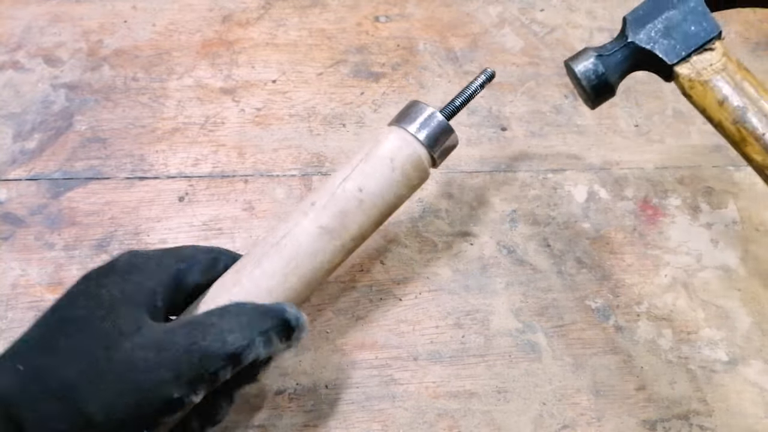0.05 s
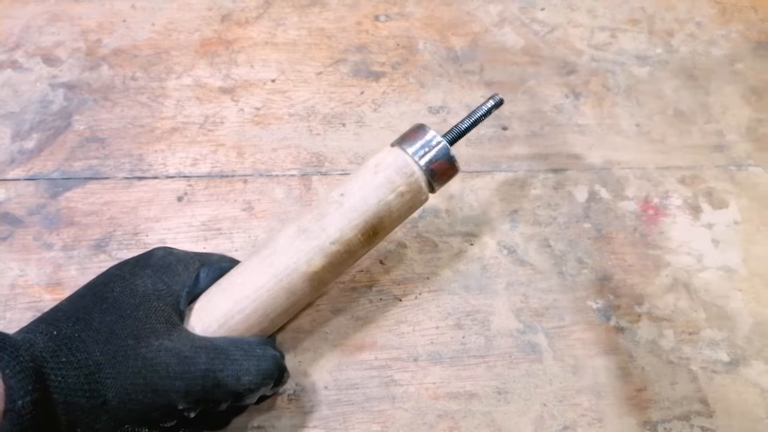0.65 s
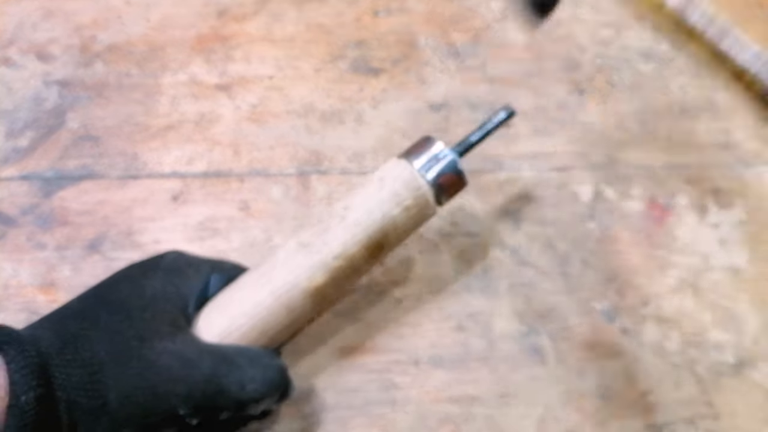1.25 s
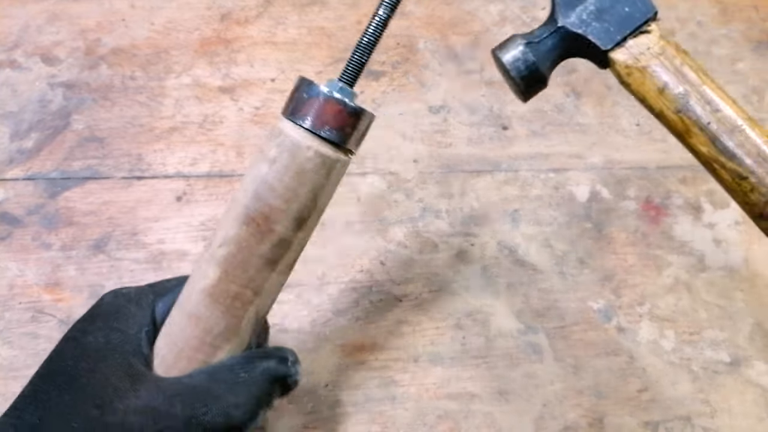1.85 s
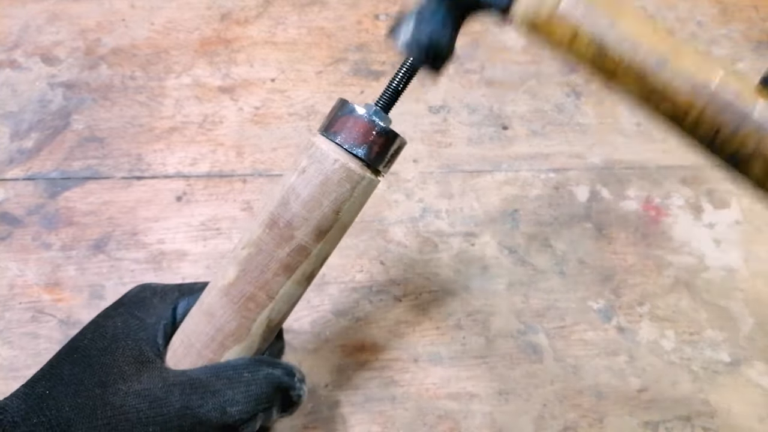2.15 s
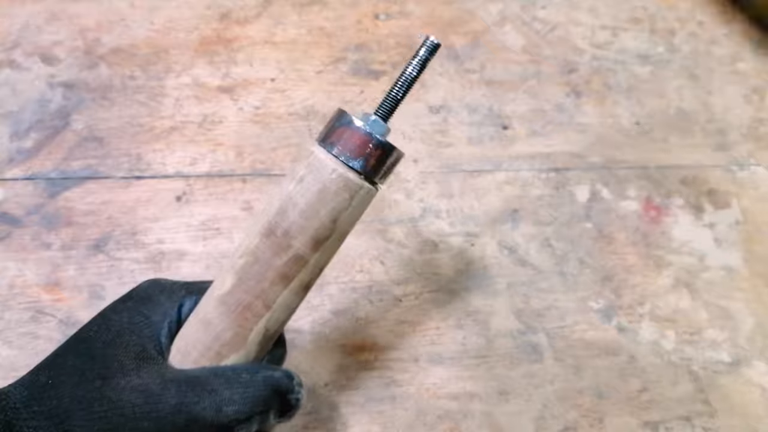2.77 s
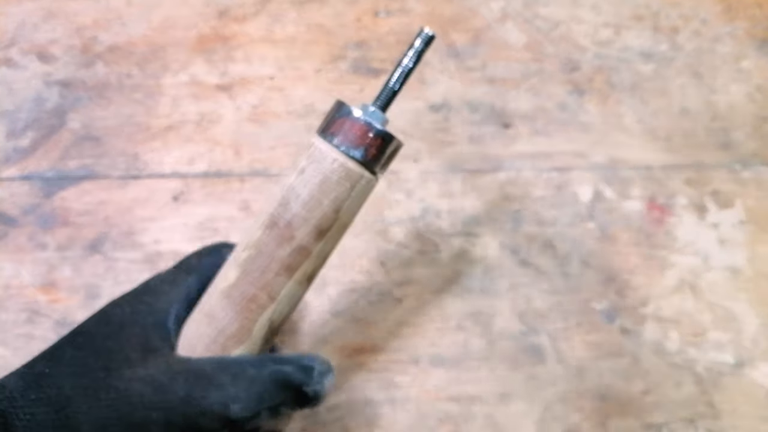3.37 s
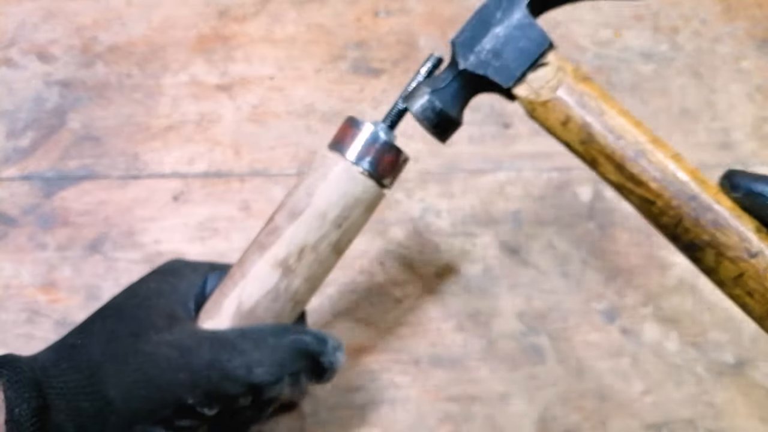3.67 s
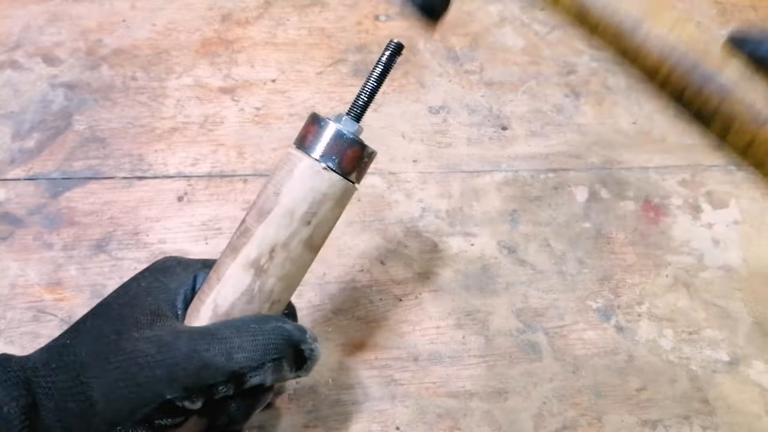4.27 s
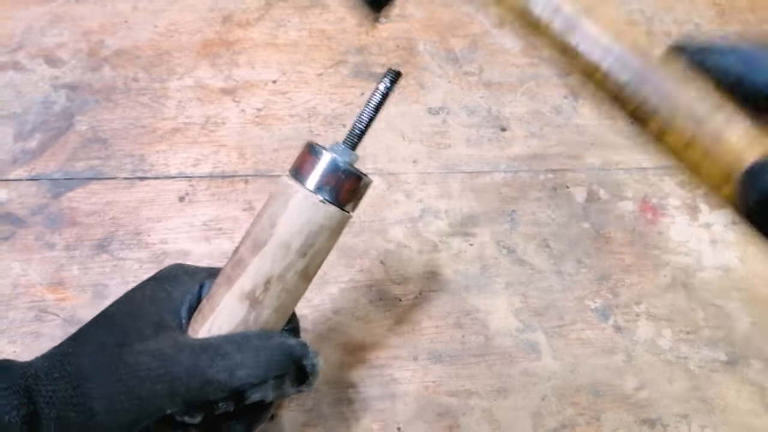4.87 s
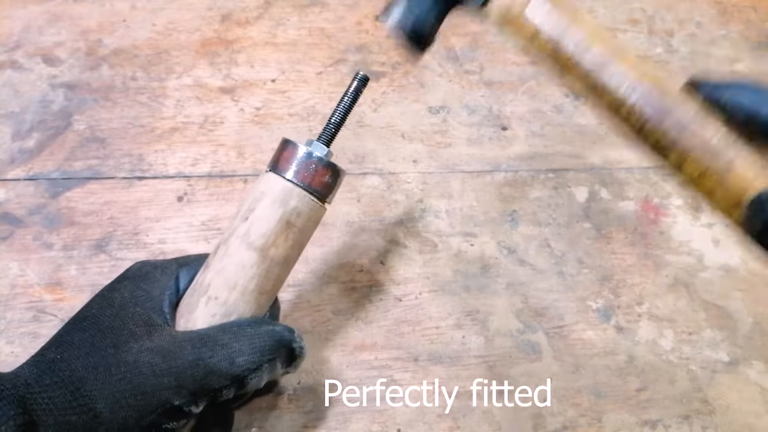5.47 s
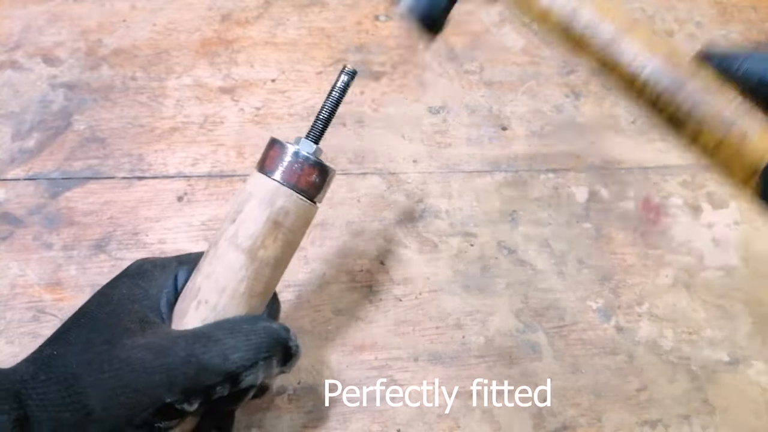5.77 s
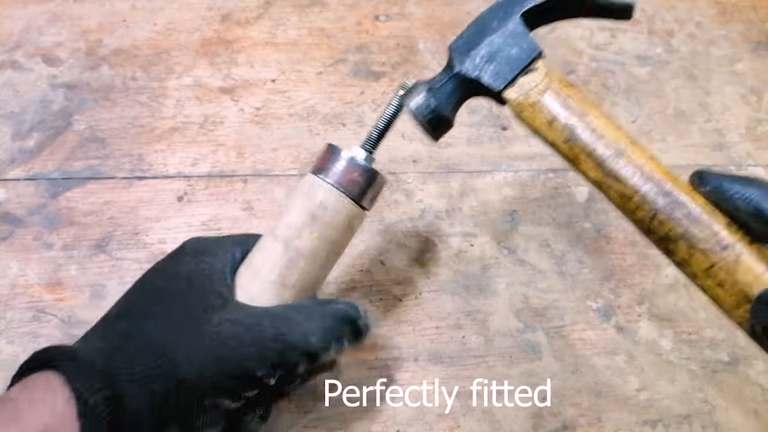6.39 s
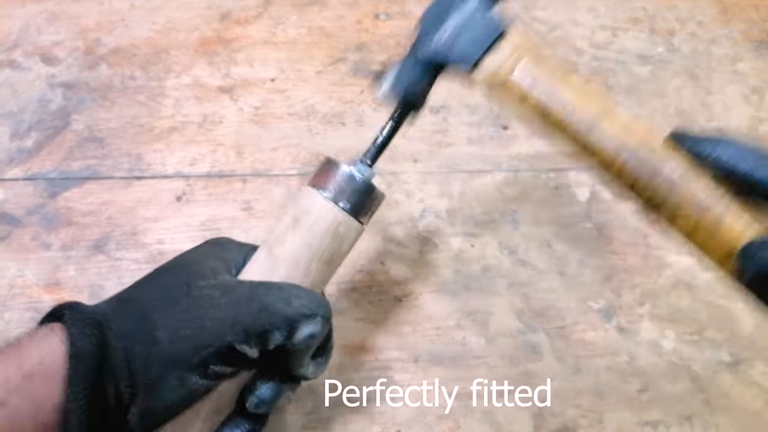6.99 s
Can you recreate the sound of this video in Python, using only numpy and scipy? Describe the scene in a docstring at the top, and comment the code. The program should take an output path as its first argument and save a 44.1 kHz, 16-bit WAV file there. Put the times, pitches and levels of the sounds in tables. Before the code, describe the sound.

Close, crisp hammer taps land on steel fitted in a wooden handle, about six a second, in three longer runs and then two shorter ones. The strikes crack and ring briefly in a small workshop, with the handle knocking back and the hammer head sometimes chattering. Faint glove rustles and light clicks fill the pauses, over quiet room tone and a very high, insect-like pulsing hiss.

```python
"""A gloved hand shifts on a wooden tool handle, and a hammer is laid against its steel tang and ferrule.
Five quick runs of blows follow, most led in by light touches. Each impact cracks, excites the damped
modes of steel and wood and reverberates in a small workshop; the handle then drops back with a dull
knock, and the head sometimes chatters. After the first run the tang's note lies a little lower.
Throughout, over faint room tone, a thin high hiss, perhaps an insect, pulses twenty times a second."""
import sys
import numpy as np
from scipy import signal
from scipy.fft import rfft, irfft
from scipy.io import wavfile

SR = 44100
rng = np.random.default_rng(int(sys.argv[2]) if len(sys.argv) > 2 else 0)


def wrap_up_sound(samples):
    """Save the sound to the file named by the first command line argument, as 16-bit audio."""
    columns = np.atleast_2d(samples).T
    # keep every value between -1 and 1, then stretch to whole-number steps
    tamed = np.clip(columns, -1, 1)
    steps = np.round(tamed * 32767).astype(np.int16)
    wavfile.write(sys.argv[1], SR, steps)


N = 310464
AGE = np.arange(SR // 3) / SR  # seconds since a contact
LEAD_S = .00008  # direct sound reaches the left microphone port first

# Full blows. Each row: start in seconds, then four traits in dB against an average blow: force,
# clank (the head sounds), edge (more tang, less wood) and jerk (the handle jumps).
BLOWS = [(0.4958, -2, -2, -1, 7), (0.6426, -3.5, -4, -1.5, -1), (0.7918, -4.5, 0, 0, 3),
         (0.9435, -1, 1.5, 4, 9.5), (1.0958, 4, -2, 2, 2.5), (1.263, 3.5, -2, 2, 5),
         (1.4167, 2.5, -1.5, 1.5, 3.5), (2.3308, -3, 3.5, -1.5, -0.5), (2.4804, -2, 3, 0.5, 4),
         (2.633, 0, 4, -1, 5), (2.7891, -6, 5.5, -1.5, 0.5), (2.9448, 5, 0, 2, 5),
         (3.116, 1.5, 1, -1.5, -14.5), (3.2747, 0, 2, 2, 0), (3.9741, -2.5, -5, -5, -10),
         (4.1284, -0.5, 0, -1, 5), (4.283, 1.5, -1.5, 0, -4), (4.4375, 2, 0, -2.5, -2),
         (4.592, 4, 0.5, -1.5, -2), (4.7431, 1, -2, -.5, 1.5), (4.8982, -5.5, 3.5, -1, 0),
         (5.4831, -5.5, -4, 3.5, -1.5), (5.6413, 0, -2, -4, -23), (5.7919, 0.7, -.8, 5, 9.5),
         (5.9444, 4, -1.5, -1.5, 14), (6.0902, 0, -3.5, 2.5, -3), (6.7233, -1.6, 0.5, -2, -5),
         (6.8803, 1.5, 3, -1, 3.5), (7.0336, 1.5, -1.5, -1, 1)]
# Light touches. Each row: start in seconds, relative force in dB, brightness in dB.
TOUCHES = [(0.3241, 7.5, 9), (1.3137, -8, -9), (2.068, -23, -1), (2.0995, -15, -6.5), (2.1485, 0.5, 2),
           (2.1548, 4, 0.5), (2.1668, 5, 11), (2.2045, -12, 4), (3.7513, -2, -1), (3.7745, -8, -4.5),
           (3.7845, 0, -0.5), (3.792, 9, 9), (4.0215, -1.5, -6.5), (4.333, -3.5, 4), (4.3395, 0.5, -3),
           (4.497, -4, -4.5), (6.0032, 1, 9.5), (6.4886, 3.5, -1), (6.494, -2.5, -7.5), (6.5015, 8, -4.5),
           (6.5085, -6, 10), (6.5148, 7, 9)]
# Modes. Each row: frequency in Hz, relative level in dB, time to decay by 60 dB in seconds.
STEEL_MODES = [(1722, -13, 0.042), (1896, -3.5, 0.026), (2214, -3.5, 0.017), (3098, -1, 0.021),
               (3754, -7.5, 0.02), (4063, -1.5, 0.021), (4130, -25, 0.14), (6258, -2.5, 0.023),
               (6570, -27.5, 0.21), (7780, -3, 0.0045), (9200, -5, 0.028), (10900, -2, .014),
               (13400, -6.5, .008)]  # hammer head and ferrule
WOOD_MODES = [(426, -10.5, 0.041), (472.7, -14.5, 0.072), (552, -9.5, 0.051), (622.7, -1, 0.039),
              (679.8, -11, 0.17), (718.6, -4, 0.044), (827.6, -4.5, .035), (887, -11.5, 0.067),
              (1044, -13, 0.065), (1129, -14, 0.053)]  # handle and bench
ROOM_MODES = [(124, -15, 0.18), (197.5, -1, 0.35), (225, 4.5, 0.36), (265, -10.5, .2)]  # low standing waves

# The five registers of a contact: wood, clank, clack, ring, tick. Each row: lower and upper edge in Hz.
REGISTER_EDGES = [(400, 1100), (1400, 2600), (2600, 4600), (4800, 7500), (9000, 15500)]
# Each entry: centre of a register in Hz.
REGISTER_HZ = [700, 2000, 3500, 6000, 12000]
# Average contacts before panning and reverberation. Each entry: level of a register in dB.
BLOW_DB = (-42.5, -43, -38.5, -36, -35)
REBOUND_DB = (-57.5, -63, -67.5, -70, -77.5)
TOUCH_DB = (-50.5, -53, -49, -54, -60.5)
# Each entry: dB gained by a register for one dB of a trait.
FORCE_SHARE = (0.94, 0.72, 0.21, 0.88, 0.14)  # force feeds wood and tang; the tick hardly grows
CLANK_SHARE = (0, 1.2, .85, 0.041, 0.053)  # the head sounds in the middle registers
EDGE_SHARE = (-0.71, -0.54, 0.035, 0.96, -0.048)  # a hit on the edge trades knock for ring
BRIGHT_SHARE = (-0.84, -0.83, -0.0026, .6, 1)  # a touch is bright on steel, dull on wood

# Glove rubs. Each row: peak time, rise and fall in seconds, centre in Hz, peak level in dB.
RUBS = [(0.115, 0.039, 0.042, 206, -70.5), (0.201, 0.12, 0.22, 1030, -80.5), (0.218, 0.2, 0.24, 4160, -77),
        (1.594, 0.0052, 0.075, 2600, -63), (1.83, 0.04, 0.11, 760, -72.5), (3.913, 0.011, 0.037, 4860, -66),
        (5.439, 0.05, 0.088, 3970, -73), (6.69, 0.15, 0.14, 117, -58)]
# Spectra. Each row: frequency in Hz, relative level in dB.
CRACK_SPECTRUM = [(100, -19), (320, -6), (520, -8.5), (800, 1), (1150, -8.5), (1500, 1.5), (2600, 4),
                  (4700, 3), (7000, 5.5), (10000, 4.5), (12500, 6), (14500, 8.5), (16000, -4.5)]
REVERB_SPECTRUM = [(100, -24.5), (300, 4.5), (600, -1.5), (1100, 7), (2000, -3), (4000, -3), (6500, -4.5),
                   (10000, -7.5), (15000, -4)]
HISS_SPECTRUM = [(12300, -34), (13000, -19), (13400, -10), (14000, -5), (14450, 0), (14800, -2), (15250, 0),
                 (15500, -6), (15750, -7), (15900, -35)]
AIR_SPECTRUM = [(20, -11.5), (55, -2.5), (140, -2.5), (300, -8.5), (700, -12.5), (1400, -19.5), (3000, -24),
                (7000, -25.5), (12000, -25.5), (16000, -20)]
# Pulsing of the hiss. Each row: time in seconds, pulses per second.
HISS_RATE = [(0, 20.4), (1.9, 20.4), (2.1, 19.77), (5, 19.77), (5.3, 19.9), (7, 19.9)]
# Slow swells of the hiss. Each row: time in seconds, level in dB.
HISS_LEVEL = [(0, -62.5), (.5, -65.5), (1.5, -68), (1.799, -62), (2.499, -70.5), (3.502, -62), (4.5, -69),
              (5.301, -63), (6.3, -65), (6.999, -62.5)]
# Imbalance of the microphone ports. Each row: frequency in Hz, left over right in dB.
PORT_BALANCE = [(100, -1.5), (300, -.5), (700, -.5), (1050, 4.5), (1500, 3), (2300, -2), (3200, -2),
                (4300, 1.5), (6300, -.5), (9500, -2), (14000, 0)]


def blows(jerk_level_db=-47.5, boom_db=-54.5, build_s=0.011, pan_db=0.24, aim_spread_db=1.47):
    """Impulsive excitation: a blow drives steel, wood and the room's standing waves; the handle rebounds."""
    out = np.zeros((2, N))
    boom = ring(ROOM_MODES, scatter_db=0, detune=0, spread_rad=.15) * (1 - np.exp(-AGE / build_s))
    for s, force_db, clank_db, edge_db, jerk_db in BLOWS:
        aim, late, size = rng.standard_normal(3)
        band_db = BLOW_DB + np.dot([force_db, clank_db, edge_db], [FORCE_SHARE, CLANK_SHARE, EDGE_SHARE])
        strike = contact(band_db, tang_note(s)) * sides(pan_db + aim_spread_db * aim)
        add(out, s, workshop(strike))
        add(out, s, undb(jerk_level_db + jerk_db) * handle_jerk() + undb(boom_db + force_db) * boom)
        rebound = contact(np.add(REBOUND_DB, force_db + 1.5 * size), tang_note(s))
        add(out, s + .049 + .004 * late, workshop(rebound))  # the handle drops back about 49 ms later
    return out


def touches():
    """Weak impacts excite the same modes as the head is laid on the work or chatters after a blow."""
    out = np.zeros((2, N))
    for s, force_db, bright_db in TOUCHES:
        band_db = np.add(TOUCH_DB, force_db) + np.multiply(BRIGHT_SHARE, bright_db)
        add(out, s, workshop(contact(band_db, tang_note(s))))
    return out


def contact(band_db, tang_hz, steel_db=-1.0, wood_db=-11, wood_rise_s=0.0024, rise_s=0.00023):
    """Superposition: one impact is the sum of a crack and the free vibrations of steel and wood."""
    tang_modes = [(tang_hz, 1, .018), (tang_hz, -23, .23)]  # the wood chokes most; a little sings on
    steel = ring(STEEL_MODES + tang_modes, scatter_db=2, detune=.007, spread_rad=.8)
    wood = ring(WOOD_MODES, scatter_db=3.0, detune=0.01, spread_rad=0.29)
    wood *= 1 - np.exp(-AGE / wood_rise_s)
    sound = crack() + undb(steel_db) * steel + undb(wood_db) * wood
    return weight_registers(sound * (1 - np.exp(-AGE / rise_s)), band_db)


def crack(snap_db=7, snap_t60=0.0031, clatter_t60=0.026):
    """A brief impact has a broad spectrum: the steel's snap arrives directly and scatters off the bench."""
    noise = rng.standard_normal(len(AGE))
    snap = np.vstack([noise, np.roll(noise, round(LEAD_S * SR))]) * fade(snap_t60)
    clatter = diffuse(len(AGE), alike_hz=1200) * fade(clatter_t60)
    return colour(undb(snap_db) * snap + clatter, CRACK_SPECTRUM)


def ring(modes, scatter_db, detune, spread_rad):
    """Free vibration is a sum of damped sinusoids, here scattered in level, tuning and phase."""
    out = 0
    for hz, db, t60 in modes:
        size, tune, skew = rng.standard_normal(3)
        phase = 2 * np.pi * hz * ((1 + detune * tune) * AGE + np.array([[LEAD_S], [0]]))
        phase = phase + rng.uniform(0, 2 * np.pi) + spread_rad * skew * np.array([[1], [-1]])
        out = out + undb(db + scatter_db * size) * fade(t60) * np.sin(phase)
    return out


def tang_note(s, first_hz=5540, later_hz=5360, first_run_ends_s=1.7, spread_hz=62):
    """The tang's resonance shifts with the grip and the spot struck; it is lower after the first run."""
    note_hz = first_hz if s < first_run_ends_s else later_hz
    return note_hz + spread_hz * rng.standard_normal()


def weight_registers(sound, band_db):
    """The place and force of an impact set how its energy divides among the registers."""
    count = SR // 50  # the levels apply to the first 20 ms
    power = np.mean(np.abs(rfft(sound[:, :count])) ** 2, axis=0) * 2 / count ** 2
    freq = np.arange(len(power)) * SR / count
    own_db = [10 * np.log10(power[(freq > lo) & (freq < hi)].sum()) for lo, hi in REGISTER_EDGES]
    return colour(sound, list(zip(REGISTER_HZ, np.array(band_db) - own_db)))


def handle_jerk(push_s=0.0011, leak_hz=14, skew_db=3):
    """Rarefaction: the handle jerks away and pulls the air with it, unevenly at the two ports."""
    pull = -AGE / push_s * np.exp(1 - AGE / push_s)
    leak = signal.butter(1, leak_hz, "high", fs=SR, output="sos")
    return signal.sosfilt(leak, pull) * sides(-0.5 + skew_db * rng.standard_normal())


def workshop(x, wet_db=-4, low_t60=0.17, high_t60=0.2, gap_s=0.002, split_hz=2500, grit_db=5):
    """Reverberation: uneven reflections follow a contact, by new paths each time as the hands move."""
    noise = diffuse(len(AGE), alike_hz=1050) * undb(grit_db * rng.standard_normal(len(AGE)))
    low = signal.sosfilt(signal.butter(1, split_hz, fs=SR, output="sos"), noise)
    onset = 1 - np.exp(-(AGE / gap_s) ** 2)
    tail = (low * fade(low_t60) + (noise - low) * fade(high_t60)) * onset
    tail = colour(unit(tail) / np.sqrt(len(AGE)), REVERB_SPECTRUM)
    return x + undb(wet_db) * signal.fftconvolve(x, tail, axes=1)[:, :len(AGE)]


def glove(edge_ratio=1.495):
    """Sliding friction of cloth on wood gives short, soft swells of band-limited noise."""
    out = 0
    for s, rise, fall, hz, db in RUBS:
        band = signal.butter(2, [hz / edge_ratio, hz * edge_ratio], "band", fs=SR, output="sos")
        rub = unit(signal.sosfilt(band, diffuse(N, alike_hz=1180)))
        swell = np.interp(np.arange(N) / SR, [s - rise, s, s + fall], [0, 1, 0])
        out = out + undb(db) * rub * swell
    return out


def high_hiss(depth_db=5.0, first_peak_s=.039, pan_db=3.0):
    """Amplitude modulation: a narrow band of noise near the top of hearing pulses and slowly swells."""
    time = np.arange(N) / SR
    rate = np.interp(time, *np.transpose(HISS_RATE))
    level_db = np.interp(time, *np.transpose(HISS_LEVEL))
    turns = np.cumsum(rate) / SR - first_peak_s * rate[0]
    hiss = colour(rng.standard_normal((2, N)), HISS_SPECTRUM) * undb(depth_db * np.cos(2 * np.pi * turns))
    return undb(level_db) * unit(hiss) * sides(pan_db)


def room_tone(level_db=-70):
    """A steady diffuse field of faint rumble and air forms the noise floor."""
    return undb(level_db) * unit(colour(diffuse(N, alike_hz=1130), AIR_SPECTRUM))


def diffuse(count, alike_hz):
    """A diffuse field is coherent at two nearby points in the bass and incoherent in the treble."""
    mid, side = rfft(rng.standard_normal((2, count)))
    freq = np.arange(len(mid)) * SR / count
    coherence = .93 / (1 + (freq / alike_hz) ** 4)
    spectrum = mid * np.sqrt(1 + coherence) + side * np.sqrt(1 - coherence) * np.array([[1], [-1]])
    return unit(irfft(spectrum, count))


def colour(x, points, size=2048):
    """Minimum-phase filtering through (Hz, dB) points: folding the cepstrum makes the response causal."""
    hz, db = np.transpose(sorted(points))
    freq = np.arange(size // 2 + 1) * SR / size
    gain = undb(np.interp(np.log(freq + 1), np.log(hz), db))
    cepstrum = irfft(np.log(gain))
    cepstrum[1:size // 2] *= 2
    cepstrum[size // 2 + 1:] = 0
    response = irfft(np.exp(rfft(cepstrum)))
    return signal.fftconvolve(x, response[None], axes=1)[:, :x.shape[1]]


def fade(t60):
    """Exponential damping by 60 dB in t60 seconds."""
    return np.exp(-np.log(1000) * AGE / t60)


def sides(pan_db):
    """Panning by level: left exceeds right by pan_db."""
    return undb(np.array([[pan_db], [-pan_db]]) / 2)


def undb(db):
    """Decibels as an amplitude ratio."""
    return 10 ** (np.asarray(db) / 20)


def unit(x):
    """Normalisation to an rms of 1."""
    return x / np.sqrt(np.mean(x ** 2))


def add(track, s, sound):
    """Superposition of a sound on the track from second s."""
    start = max(int(s * SR), 0)
    part = track[:, start:start + sound.shape[1]]
    part += sound[:, :part.shape[1]]


def scene():
    """The pressures of hammer, glove and background add linearly."""
    return blows() + touches() + glove() + high_hiss() + room_tone()


def record(dry, notch_hz=8200, notch_db=-12, top_hz=16300):
    """Frequency response: two slightly unequal microphone ports notch the treble; the top is cut steeply."""
    left = colour(dry[:1], [(hz, db / 2) for hz, db in PORT_BALANCE])
    right = colour(dry[1:], [(hz, -db / 2) for hz, db in PORT_BALANCE])
    notch = [(6800, 0), (7500, -3), (notch_hz, notch_db), (9100, -3), (10000, 0)]
    ported = colour(np.vstack([left, right]), notch)
    rolled = colour(ported, [(15300, 0), (15700, -3), (16100, -12)])
    return signal.sosfilt(signal.ellip(8, .2, 70, top_hz, fs=SR, output="sos"), rolled)


dry = scene()
out = record(dry)
wrap_up_sound(out)
```